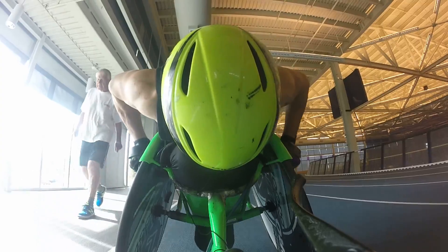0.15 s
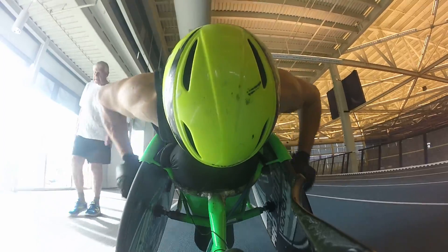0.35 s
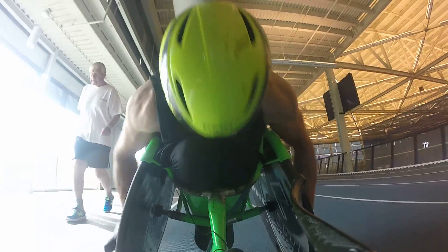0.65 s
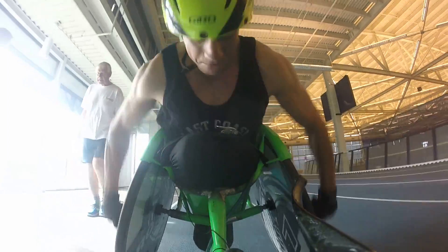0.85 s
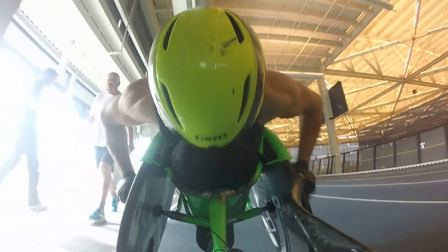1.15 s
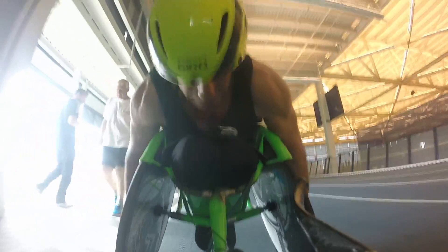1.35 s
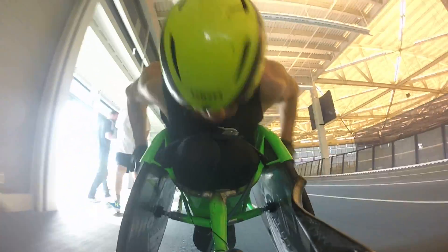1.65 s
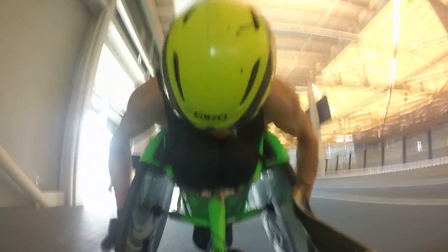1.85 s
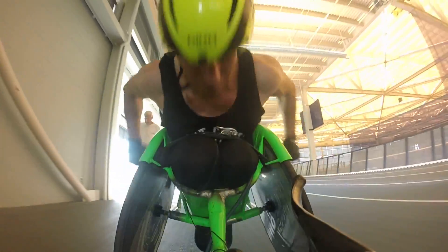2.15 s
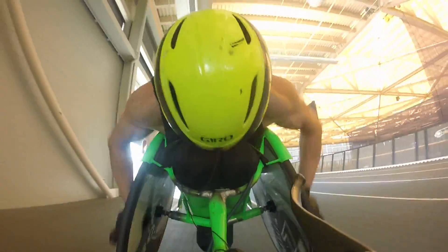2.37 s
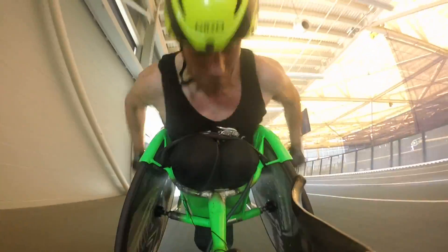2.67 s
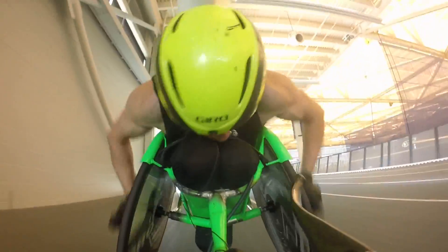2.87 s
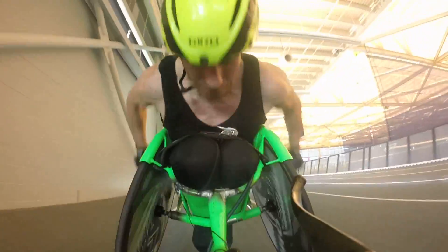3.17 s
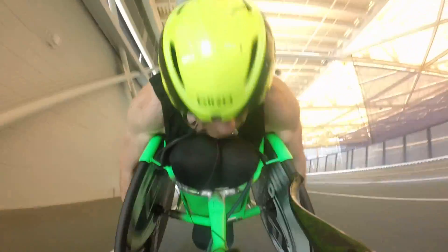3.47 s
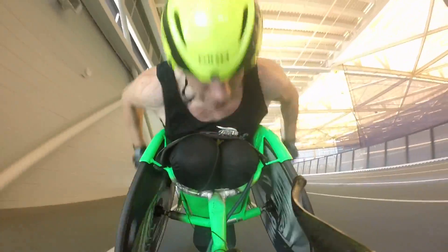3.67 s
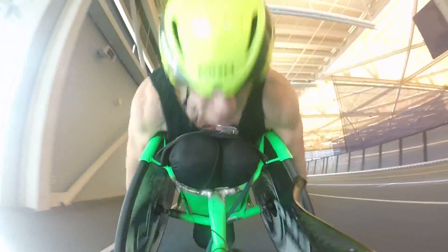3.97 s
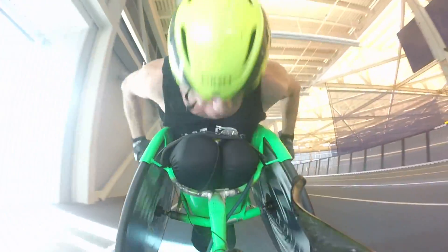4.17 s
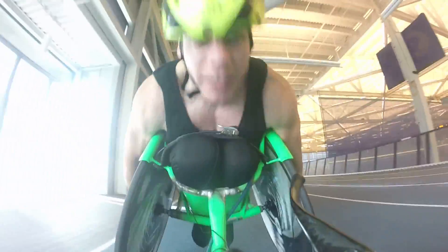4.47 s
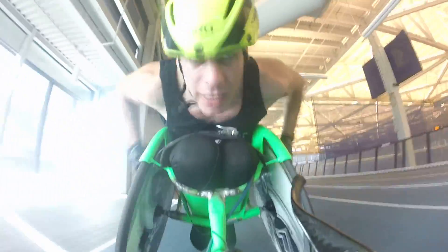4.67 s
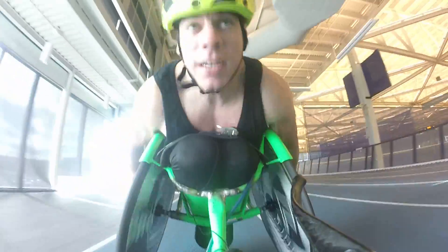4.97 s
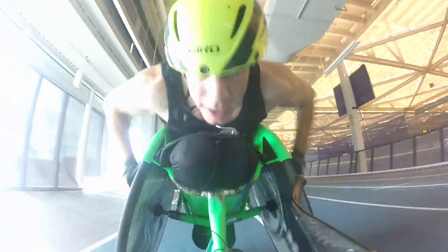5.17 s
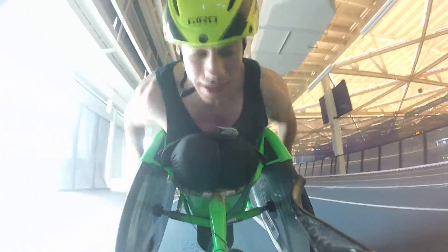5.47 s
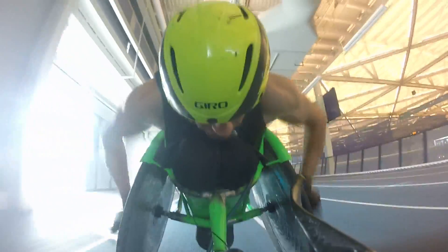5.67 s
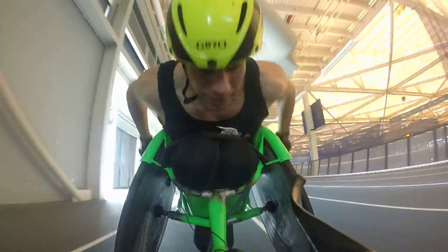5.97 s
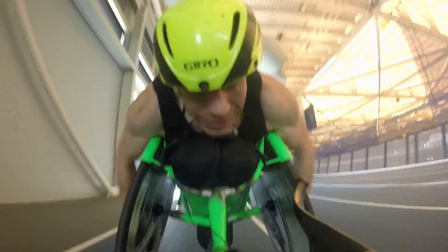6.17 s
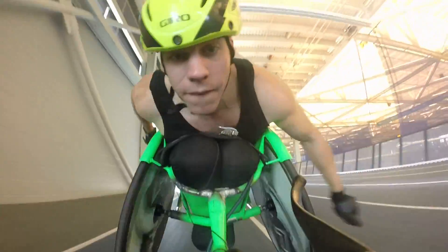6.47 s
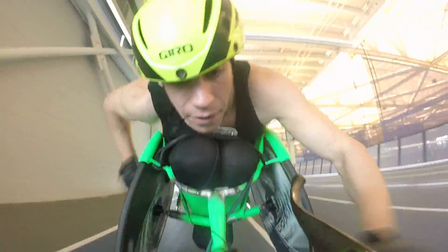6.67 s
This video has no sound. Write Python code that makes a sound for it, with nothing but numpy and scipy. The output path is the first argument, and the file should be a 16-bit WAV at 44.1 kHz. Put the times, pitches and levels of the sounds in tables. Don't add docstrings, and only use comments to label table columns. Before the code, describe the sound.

Racing wheelchair heard from its own frame: deep throbbing vibration, rhythmic jolts at each rim push, sharp clacks, ticking and faint tyre rush.

```python
import sys
import numpy as np
from scipy import signal
from scipy.fft import rfft, irfft, next_fast_len
from scipy.io import wavfile
from scipy.ndimage import uniform_filter1d, map_coordinates

SR = 44100
rng = np.random.default_rng(int(sys.argv[2]) if len(sys.argv) > 2 else 0)


def gain_from_db(level_db):
    decades = np.asarray(level_db, float) / 20
    return 10 ** decades


def master_out(mix):
    frames = np.transpose(np.atleast_2d(mix))
    ceiling = np.clip(frames, -1, 1)
    pcm = np.round(ceiling * 32767).astype(np.int16)
    wavfile.write(sys.argv[1], SR, pcm)


N = 301203

# time in seconds, level in dB.
SWAY = [(0.0, -20), (0.3, -19), (0.566, -15.5), (0.59, -13), (1.1, -16.5), (1.3, -8), (1.85, -21),
        (2.45, -21), (2.76, -15.5), (3.4, -15.5), (3.8, -15), (4.4, -13.5), (5.2, -13.5), (6.83, -10)]
# time in seconds, sway pitch in Hz, flutter level in dB.
SWAY_PITCH = [(0.0, 74.1, -36), (0.36, 74.9, -35), (0.44, 87.1, -37), (1.01, 76.8, -31),
              (1.46, 62.7, -46.5), (1.58, 73.9, -41), (2.38, 72.8, -35), (2.55, 55.3, -44),
              (3.5, 68.1, -39), (4.37, 57.7, -39.5), (5.23, 74.1, -38.5), (6.83, 56.4, -39)]
# quietest time in seconds, depth in dB, recovery in seconds.
LULLS = [(0.351, 10.5, 0.37), (1.203, 12.5, 0.17), (1.338, 24, 0.21), (1.501, 7.5, 0.23),
         (2.018, 27.5, 0.083), (2.587, 16.5, 0.16), (3.102, 14.5, 0.37), (3.439, 7.5, 0.24),
         (3.618, 16, 0.19), (4.049, 12, 0.06), (4.547, 25.5, 0.059), (4.64, 12, 0.026), (4.85, 8.5, 0.053),
         (4.999, 10.5, 0.11), (5.32, 7.5, 0.043), (6.3, 4, 0.024), (6.361, 16, 0.024), (2.975, 5.5, 0.045),
         (6.815, 6.5, 0.091)]
CALM_S, TYRE_CALM = 0.086, 0.66
FLUTTER_LOAD = 0.4
# time in seconds, signed peak of full scale, pitch in Hz.
JOLTS = [(0.594, -.87, 70), (0.623, .65, 66), (0.844, .58, 100), (0.876, -.76, 85), (0.91, -.63, 75),
         (0.96, -.75, 80), (1.092, -.75, 85), (1.247, .95, 72), (1.424, .4, 66), (1.743, .47, 100),
         (1.903, .9, 72), (2.321, -.52, 70), (2.476, .93, 76), (2.88, .56, 83), (3.018, .9, 78),
         (3.339, -.45, 75), (3.37, -.69, 74), (3.504, .82, 78), (3.787, -.72, 64), (3.962, -.65, 70),
         (4.14, .46, 80), (4.305, .71, 72), (4.445, .92, 76), (4.893, -.69, 72), (5.198, .67, 70),
         (5.358, -.61, 68), (5.541, .68, 70), (5.68, -.7, 66), (5.941, -.65, 58), (6.162, -.71, 75),
         (6.395, -.57, 66), (6.642, .66, 70), (6.676, .7, 70), (6.714, .59, 70), (6.748, .53, 62)]
STOP_SHARE, STOP_S = 0.9, 0.018
DOWN_DAMPING = 0.89
WIND_UP, WIND_UP_S = 0.51, 0.008
RELEASE_PEAK, SOFTEN_S = 0.78, 0.0029

# centre in Hz, width in Hz, gain in dB.
TUBE = [(333, 135, 4.5), (861, 255, 2)]
# centre in Hz, width in Hz, gain in dB.
CASE = [(1426, 366, -6.5), (1996, 252, -1), (2017, 35, -5.5)]
# centre in Hz, width in Hz, gain in dB.
SHELL = [(2910, 205, 5.5), (3520, 1860, -4.5), (4710, 250, 4.5), (5950, 470, -3)]
# centre in Hz, width in Hz, gain in dB.
LATCH = [(7600, 680, 1.5), (9700, 390, 0.5), (10700, 1500, -2)]
# centre in Hz, width in Hz, gain in dB.
LIP = [(2980, 650, -2.5), (4600, 670, 0.5), (6140, 1000, -3.5)]

# time in seconds, peak in dB, tube in dB, shell in dB.
CLACKS = [(1.062, -29.5, -4.5, -12.5), (1.1452, -9.5, -5, -3), (1.719, -24, 3, 0.5), (1.885, -24, -3, -13),
          (1.9066, -26.5, 7.5, -4.5), (2.306, -22, -2, -3), (2.3329, -15, 6, -4.5), (2.341, -24, 5.5, -6),
          (2.352, -29.5, -1, -10), (2.4845, -30.5, 12, -3), (2.847, -18, -4.5, -17),
          (2.872, -22.5, -2.5, 0), (2.912, -22.5, 1, -11), (3.341, -19, 2, -4.5), (3.397, -25, 8, -5),
          (3.806, -30.5, -9, -6), (3.844, -26, -2, -4.5), (3.929, -29, -1, -6.5), (4.2958, -22, 5.5, -0.5),
          (4.786, -25.5, 2.5, -5), (5.225, -31, 4, -14), (5.341, -28.5, -1, -1), (5.6849, -19.5, -5, -6),
          (6.1103, -32, 1, -19), (6.777, -15, 2, -5), (6.7987, -11.5, 2.5, -2.5),
          (6.8254, -10.5, -11, -20.5)]
# time in seconds, peak in dB.
RAPS = [(0.012, -34), (0.843, -38), (1.414, -38), (1.511, -37.5), (1.529, -33), (1.806, -31), (2.292, -40),
        (2.3871, -35), (2.475, -32), (3.0167, -31), (3.911, -31.5), (4.389, -30.5), (4.669, -33.5),
        (4.7675, -33.5), (4.827, -36), (5.595, -33.5), (5.7174, -37), (6.18, -29.5), (6.216, -34),
        (6.48, -37)]
# time in seconds, peak in dB, tube in dB.
PINGS = [(0.153, -43, -16), (0.219, -29.5, 0), (0.248, -37.5, -23), (0.361, -30.5, -2), (0.607, -20.5, -6),
         (0.702, -28, -12), (0.728, -27.5, -19), (0.8613, -30, 10), (0.876, -16.5, -16), (0.913, -21, -5),
         (1.106, -21, -21), (1.2245, -30, -6), (1.2547, -27, -12), (2.074, -21, -13), (2.183, -29.5, -11),
         (2.9273, -27, 8.5), (3.4372, -26.5, -2.5), (3.826, -26.5, -7), (4.1018, -23.5, -4),
         (4.3745, -25, 0), (5.323, -28, -10.5), (5.779, -33.5, -11), (6.137, -18, -6), (6.785, -19.5, 12),
         (6.793, -12.5, 5.5)]
# time in seconds, peak in dB, shell in dB.
THUDS = [(0.039, -27.5, -12), (0.1276, -28.5, -29), (0.186, -29, -26), (0.5964, -19.5, -19.5),
         (0.62, -25.5, -38), (0.64, -25.5, -32.5), (0.673, -35, -49), (0.906, -21.5, -38),
         (0.94, -26.5, -42.5), (1.115, -17.5, -22), (1.332, -31, -31), (1.437, -34.5, -12),
         (1.7304, -7, -15.5), (1.772, -24.5, -29), (1.788, -23, -24.5), (2.365, -26, -25),
         (3.3773, -21, -39), (3.5045, -22, -9.5), (3.787, -33, -4), (3.963, -21, -17), (4.3299, -17.5, -27),
         (4.45, -22.5, -16), (4.702, -27.5, -35), (4.8905, -16.5, -13.5), (5.2377, -10.5, -16.5),
         (5.7014, -14, -15), (5.74, -13, -12.5), (5.981, -16.5, -29), (6.153, -4.5, -15),
         (6.2592, -21, -20)]
# time in seconds, peak in dB, tube in dB.
TICKS = [(0.9787, -29, -2), (1.0892, -12.5, 4.5), (1.249, -19.5, 1.5), (2.3212, -21, -36.5),
         (2.7906, -32, 0.5), (2.863, -27.5, -30), (3.368, -24, 0.5), (4.682, -27.5, 5.5),
         (5.545, -33.5, -2), (5.674, -26.5, 0), (6.1436, -17, 4.5), (6.647, -40, -23), (6.678, -30.5, 7)]
# time in seconds, peak in dB.
NUDGES = [
    (0.055, -36),
    (0.097, -42),
    (0.174, -39),
    (0.232, -42),
    (0.769, -41),
    (0.81, -35),
    (1.956, -37),
    (2.203, -36.5),
    (2.587, -37.5),
    (5.758, -34.5),
]
CLACK_S, RAP_S, PING_S, THUD_S, TICK_S, NUDGE_S = 0.0015, 0.0023, 0.0012, 0.0015, 0.0012, 0.0018
RAP_TUBE_DB, RAP_SHELL_DB, NUDGE_TUBE_DB, NUDGE_SHELL_DB = 3, -5, 1, -28.5
PING_SHELL_DB, THUD_CASE_DB, TICK_CASE_DB = -18, 13, 7

# start in seconds, length in seconds, level in dB.
RATTLES = [(1.058, 0.075, -55.5), (1.257, 0.13, -48.5), (1.416, 0.11, -51.5), (1.72, 0.095, -51),
           (1.85, 0.13, -53), (2.077, 0.056, -52.5), (2.289, 0.053, -42), (2.75, 0.06, -53.5),
           (2.832, 0.094, -46.5), (2.988, 0.22, -52.5), (3.357, 0.2, -55.5), (3.79, 0.23, -50.5),
           (4.079, 0.094, -48), (4.23, 0.37, -52.5), (4.664, 0.33, -52.5), (5.028, 0.052, -50.5),
           (5.147, 0.16, -50.5), (5.341, 0.043, -50.5), (5.424, 0.068, -51), (5.539, 0.048, -52),
           (5.674, 0.15, -51.5), (5.877, 0.146, -48.5), (6.103, 0.18, -49), (6.388, 0.21, -50.5),
           (6.636, 0.23, -47.5)]
REST_DB, REST_DB_PER_S, TIRE_DB_PER_S, SETTLE_DB_PER_S = -74, 1.7, 10, 500

# time in seconds, peak in dB.
LIP_EARLY = [(1.1704, -36), (1.1875, -37), (1.226, -46.5), (1.4287, -42), (1.4335, -46), (1.5255, -36),
             (1.74, -39), (1.757, -34), (1.8, -41), (2.19, -43.5), (2.294, -38.5), (2.3414, -37),
             (2.3536, -37), (2.3636, -41), (2.3903, -33.5), (2.478, -50), (2.7583, -42), (2.789, -39.5),
             (2.798, -31.5), (2.8382, -36), (2.84, -37), (2.8494, -26.5), (2.8557, -28.5), (2.887, -36.5),
             (2.893, -44), (2.9137, -33), (3.009, -40), (3.0187, -39), (3.3916, -44), (3.401, -37),
             (3.466, -39), (3.4762, -42), (3.5055, -27), (3.7914, -40), (3.847, -32), (3.8655, -34),
             (3.9172, -44), (3.928, -35), (3.965, -41), (3.9724, -41), (3.9933, -45), (4.1104, -35.5),
             (4.138, -46), (4.1446, -42), (4.156, -43.5), (4.169, -46), (4.253, -43), (4.3126, -33),
             (4.3216, -34.5), (4.35, -38), (4.356, -40), (4.3967, -45), (4.4217, -37.5),
             (1.5618, -47), (2.0068, -54), (2.1321, -49), (2.4309, -53), (2.5047, -45), (2.5144, -49),
             (2.5234, -56), (2.5314, -54), (2.5716, -51), (2.599, -47.5), (2.7007, -46), (2.7357, -54),
             (2.7432, -46), (3.073, -54), (3.102, -52), (3.1183, -44), (3.1603, -41.5), (3.2145, -44.5),
             (3.4481, -37), (3.5892, -49), (3.5984, -49), (3.7717, -46)]
# time in seconds, peak in dB, latch over shell in dB.
LIP_AT_SPEED = [(4.665, -36, -2), (4.6707, -41, 4.5), (4.6852, -44, -15), (4.6951, -37, -6), (4.7422, -42, -8),
                (4.7478, -41, 1), (4.755, -42, -5.5), (4.7715, -46, -4), (4.787, -45, -15.5), (4.8209, -42, -6),
                (4.857, -33.5, -34), (4.8861, -29, -23), (4.8954, -45, -11), (4.9423, -44, -20),
                (4.969, -45, -4), (4.9843, -44, -10), (5.0508, -38, -11), (5.07, -37, -8), (5.166, -41, -1),
                (5.1985, -30, -9), (5.225, -36, -22), (5.2803, -41, -7), (5.2868, -43, -18), (5.3413, -46, -7),
                (5.3607, -34, -7.5), (5.3797, -42.5, -8), (5.3894, -30, -10), (5.4322, -37, -6),
                (5.4403, -45, -5.5), (5.4523, -45, -15), (5.465, -41, -6), (5.477, -42, -4), (5.548, -36.5, 5),
                (5.5554, -46, -8), (5.564, -42, -4.5), (5.596, -37, -25),
                (5.6726, -37, -3), (5.7328, -34, -24), (5.754, -44, -1), (5.7814, -36, -13), (5.792, -43, -7),
            (5.8, -36, -9), (5.807, -38, -10), (5.827, -39, -6), (5.8869, -42.5, -15), (5.8968, -41, -18),
            (5.9213, -38, -6), (5.9407, -31, -16), (5.9497, -38, -6), (5.958, -37, -18), (5.976, -46, 2),
            (5.997, -47, -9.5), (6.0084, -39, -7), (6.0262, -40, 8), (6.0406, -35, -8.5),
            (6.1116, -33, -25), (6.134, -33.5, -5.5), (6.1735, -40, -14), (6.189, -38, -21),
            (6.192, -42, -9.5), (6.197, -32, -8), (6.2036, -38, 1), (6.2176, -41, -2), (6.2524, -42, 0),
            (6.3942, -38, -2), (6.402, -34, -6), (6.4102, -48, -6), (6.431, -35, -7), (6.4368, -40, -5),
            (6.479, -30.5, -7), (6.509, -43, -11), (6.514, -38.5, -3), (6.531, -35.5, -11),
            (6.5523, -31.5, -2.5), (6.5667, -33.5, -8), (6.584, -40, -17), (6.631, -38, -7), (6.65, -30, 2),
            (6.6742, -33.5, 2), (6.7001, -46, 6), (6.7066, -46, -15.5), (6.714, -36, -6),
            (6.72, -42.5, -14), (6.728, -42, -7.5), (6.737, -33, -3), (6.7425, -41, -16), (6.748, -40, -10),
            (6.7544, -39, 1), (6.763, -32, -8)]
LIP_S, LIP_LATCH_DB, LIP_CASE_DB = 0.00087, -9.5, 0.5

# time in seconds, peak in dB.
RINGS = [(1.149, -17.5), (2.022, -57), (3.06, -53), (3.088, -47), (4.0, -51), (4.549, -50), (5.115, -43),
         (5.4, -42), (5.837, -36), (6.085, -45), (6.42, -39), (6.682, -34)]
RING_HZ, RING_RISE_S, RING_FALL_S = 1980, 0.0057, 0.0041
# start in seconds, peak in dB, pitch in Hz, length in seconds.
HUMS = [
    (0.823, -15.5, 145, 0.06),
    (1.713, -13, 140, .045),
    (2.292, -14, 130, .05),
    (3.348, -19, 145, 0.055),
    (4.275, -17.5, 150, 0.049),
    (6.124, -15, 155, 0.059),
    (6.505, -41, 570, .04),
    (6.589, -36, 570, 0.077),
]
# centre in Hz, width in Hz, gain in dB.
CREAK = [(820, 140, 4), (1680, 160, 3.5), (4770, 100, -15.5)]
CREAK_S, CREAK_LENGTH_S, CREAK_DB = 0.515, 0.22, -34.5

# start in seconds, length in seconds, level in dB, extra tyre load in dB.
SCRAPES = [(0.528, 0.27, -39.5, -5), (0.767, 0.28, -34, 4.5), (1.071, 0.037, -18, 14.5),
           (1.683, 0.062, -31.5, 6.5), (2.255, 0.14, -30.5, 11.5), (2.83, 0.024, -27.5, 17.5),
           (3.306, 0.27, -39.5, 20.5), (3.749, 0.38, -55, 12.5), (4.251, 0.075, -62, 12.5),
           (4.667, 0.22, -40.5, 12.5), (5.21, 0.054, -32.5, -3), (5.653, 0.12, -33, -7.5),
           (6.127, 0.049, -25.5, 3.5), (6.777, 0.036, -25.5, 22.5)]
LOAD_LAG_S, LOAD_RISE_S, LOAD_FALL_S = 0.032, 0.033, 0.17
# time in seconds, level in dB.
ROLL = [(0.0, -44), (0.38, -47.5), (0.9, -41), (1.25, -47), (2.6, -50.5), (3.6, -51.5), (4.7, -48),
        (5.5, -43), (6.3, -47), (6.83, -42)]
# frequency in Hz, density in dB per Hz.
TYRE_SPECTRUM = [(110, -22.5), (200, -11.5), (329, 0), (441, -14.5), (555, -9), (675, -18), (1130, -22),
                 (1530, -14), (2370, -36.5), (3500, -37), (4550, -58), (7700, -120)]
# time in seconds, level in dB.
WHIRR = [(0, -57), (2, -72), (3.7, -67), (5.4, -69), (6.83, -62.5)]
# centre in Hz, width in Hz, gain in dB.
WHIRR_BAND = [(1400, 260, 0)]
# time in seconds, level in dB.
WASH = [(0, -55.5), (.5, -57.5), (.65, -53.5), (1.05, -59), (1.25, -80), (6.83, -64)]
# frequency in Hz, density in dB per Hz.
HALL_SPECTRUM = [(2300, -22), (2600, -11.5), (3050, 1.5), (3800, -3.5), (4250, -16.5), (4750, -5),
                 (5200, -12.5), (9000, -17), (12300, -16), (14500, -32)]
FULL_SCALE = 0.99


def unit(x):
    return x / np.sqrt(np.mean(x ** 2) + 1e-20)


def curves(rows):
    s, *columns = np.transpose(rows)
    return [np.interp(np.arange(N) / SR, s, column) for column in columns]


def wobble(rate_hz):
    knots = rng.standard_normal(int(N * rate_hz / SR) + 4)
    return map_coordinates(knots, [np.arange(N) * rate_hz / SR])


def filtered(x, response):
    m = next_fast_len(N + SR // 2)
    return irfft(rfft(x, m) * response(np.fft.rfftfreq(m, 1 / SR)), m)[:N]


def resonate(x, modes):
    def response(f):
        return sum((-1) ** k * gain_from_db(db) * 1j * f * width / (hz * hz - f * f + 1j * f * width)
                   for k, (hz, width, db) in enumerate(modes))
    return filtered(x, response)


def hiss(spectrum):
    hz, db = np.transpose(spectrum)
    return unit(filtered(rng.standard_normal(N), lambda f: gain_from_db(np.interp(np.log(f + 1), np.log(hz), db))))


def bursts(times_s, lengths_s, dbs):
    k = np.arange(SR // 25)
    u = k / (np.clip(lengths_s, .0003, .008)[:, None] * SR)
    shape = np.sqrt(u) * np.exp(-u)
    grit = shape * rng.standard_normal(shape.shape)
    gain = gain_from_db(dbs) * np.linalg.norm(shape, axis=1) / np.linalg.norm(grit, axis=1)
    rows = gain[:, None] * grit
    at = np.round(times_s * SR).astype(int)[:, None] + k
    return np.bincount(at.ravel(), rows.ravel(), N + len(k))[:N]


def boom(calm_db, load_db):
    hz, flutter_db = curves(SWAY_PITCH)
    sway_db = curves(SWAY)[0] + calm_db
    phase = 2 * np.pi * np.cumsum(hz * (1 + .12 * wobble(18))) / SR
    swing = gain_from_db(3 * wobble(21)) * np.sin(phase)
    slow = filtered(rng.standard_normal(N), lambda f: 1 / (1 + (f / 72) ** 6))
    bumps = resonate(slow, [(56.5, 22, 0)])
    bending = resonate(resonate(rng.standard_normal(N), [(114.9, 35, 0)]), [(123.0, 100, 0)])
    bending = unit(gain_from_db(2.2 * wobble(12)) * bending)
    flutter = gain_from_db(flutter_db + FLUTTER_LOAD * load_db + .5 * sway_db + 14.0) * bending
    sway = unit(swing) + .6 * unit(bumps)
    spread = np.abs(uniform_filter1d(sway ** 2, size=3500)) + .05
    return gain_from_db(sway_db) * unit(sway / spread ** 0.33) + flutter


def lulls():
    t = np.arange(N) / SR
    return -sum(np.interp(t, [s - CALM_S, s, s + back_s], [0, depth_db, 0]) for s, depth_db, back_s in LULLS)


def stopped():
    t = np.arange(N) / SR
    stops = [np.interp(t, [s - STOP_S / 2, s, s + STOP_S / 2, s + 2 * STOP_S], [0, 1, 1, 0])
             for s, *_ in JOLTS]
    return 1 - STOP_SHARE * np.max(stops, axis=0)


def jolts():
    out, t = np.zeros(N + SR), np.arange(SR // 6) / SR
    lead = np.sin(np.pi * np.arange(round(WIND_UP_S * SR)) / (WIND_UP_S * SR)) ** 2
    for s, peak, hz in JOLTS:
        padded = peak < RELEASE_PEAK
        cycles = 0.86 * hz * t + .16 * (1 - np.exp(-t / 0.0035))
        life_s = t / (DOWN_DAMPING if peak < 0 else 1)
        decay = np.exp(-life_s / 0.0062) + 0.25 * np.exp(-life_s / 0.023)
        ring = np.sin(2 * np.pi * cycles) * decay * (1 - np.exp(-t / 0.0034))
        shove = np.append(-WIND_UP * padded * lead, ring / ring.max())
        if padded:
            shove = uniform_filter1d(shove, size=round(SOFTEN_S * SR))
        out[round(s * SR) - len(lead):][:len(shove)] += peak * shove / shove.max()
    return out[:N]


def contacts():
    return ([(s, db, tube, shell, CLACK_S) for s, db, tube, shell in CLACKS]
            + [(s, db, RAP_TUBE_DB, RAP_SHELL_DB, RAP_S) for s, db in RAPS]
            + [(s, db, NUDGE_TUBE_DB, NUDGE_SHELL_DB, NUDGE_S) for s, db in NUDGES]
            + [(s, db, tube, PING_SHELL_DB, PING_S) for s, db, tube in PINGS]
            + [(s, db - THUD_CASE_DB, THUD_CASE_DB, shell + THUD_CASE_DB, THUD_S) for s, db, shell in THUDS]
            + [(s, db - TICK_CASE_DB, tube + TICK_CASE_DB, TICK_CASE_DB, TICK_S) for s, db, tube in TICKS])


def knocks(table, boost_db):
    s, db, tube_db, shell_db, length_s = np.transpose(table)
    s, db = s - .3 * length_s, db + boost_db
    tube = 0
    for k, shift in enumerate([.93, 1, 1.08]):
        hits = bursts(s[k::3], 0.71 * length_s[k::3], (db + tube_db)[k::3] + 25.5)
        tube = tube + resonate(hits, [(hz * shift, width, gain) for hz, width, gain in TUBE])
    case = resonate(bursts(s, 1.83 * length_s, db + 27.0), CASE)
    shell = resonate(bursts(s, 1.61 * length_s, db + shell_db + 16.0), SHELL)
    latch_db = 1.25 * (db + shell_db) + 15.0 + 3 * rng.standard_normal(len(s))
    latch = resonate(bursts(s, 0.88 * length_s, latch_db), LATCH)
    return tube + case + shell + latch


def play():
    t = np.arange(N) / SR
    opened = []
    for s, length_s, db in RATTLES:
        settling = SETTLE_DB_PER_S * np.maximum(t - s - length_s, 0)
        opened.append(np.where(t < s, REST_DB, db - TIRE_DB_PER_S * (t - s) - settling))
    return np.maximum(REST_DB + REST_DB_PER_S * t, np.max(opened, axis=0))


def chatter(sway, level_db):
    slots = N // 100 + 1
    luck = np.clip(rng.standard_normal((4, slots)), -2, 1.2)
    smooth = np.abs(uniform_filter1d(sway, size=40))
    turns = signal.find_peaks(smooth, distance=110)[0]
    s, db = np.zeros(slots), np.full(slots, -200.)
    s[turns // 100] = turns / SR
    db[turns // 100] = level_db[turns] + 11 * np.log10(smooth[turns] + 0.0048) + 27
    clumps_db = 1.7 * np.resize(wobble(11.0)[::100], slots)
    s = np.abs(s + 0.0017 * luck[0])
    db = db + 5 * luck[1] + clumps_db
    length_s = .0011 * gain_from_db(3.5 * luck[2])
    ticks = bursts(s, length_s, db)
    latch = resonate(bursts(s, length_s, db + 6 * luck[3] - 6.0), LATCH[:1])
    return resonate(ticks, SHELL) + gain_from_db(4.0) * resonate(ticks, CASE) + gain_from_db(9) * resonate(ticks, TUBE) + latch


def lip():
    rows = [(s, db, LIP_LATCH_DB) for s, db in LIP_EARLY] + LIP_AT_SPEED
    s, db, latch_db = np.transpose(rows)
    length_s = LIP_S * gain_from_db(3.2 * rng.standard_normal(len(s)))
    ticks = bursts(s, length_s, db + 15.5)
    latch = bursts(s, length_s, db + latch_db + 20.0)
    return resonate(ticks, LIP) + gain_from_db(LIP_CASE_DB) * resonate(ticks, CASE) + resonate(latch, LATCH[:1])


def rings():
    out, t = np.zeros(N + SR), np.arange(SR // 20) / SR
    shape = (1 - np.exp(-t / RING_RISE_S)) * np.exp(-t / RING_FALL_S)
    for s, db in RINGS:
        hz = RING_HZ * (1 + .012 * rng.standard_normal())
        out[round(s * SR):][:len(t)] += gain_from_db(db) * shape / shape.max() * np.sin(2 * np.pi * hz * t)
    return out[:N]


def hums():
    t, waver_s = np.arange(N) / SR, np.cumsum(1 + 0.052 * wobble(40)) / SR
    out = np.zeros(N)
    for s, db, hz, length_s in HUMS:
        swell = np.sin(np.pi * np.clip((t - s) / length_s, 0, 1)) ** 2
        out += gain_from_db(db) * swell * np.sin(2 * np.pi * hz * waver_s)
    return out


def creak():
    u = np.clip((np.arange(N) / SR - CREAK_S) / CREAK_LENGTH_S, 0, 1)
    slips = gain_from_db(3.8 * wobble(70.56)) * rng.standard_normal(N)
    return gain_from_db(CREAK_DB) * np.sin(np.pi * u) * unit(resonate(slips, CREAK))


def gloves():
    t, level = np.arange(N) / SR, np.zeros(N)
    for s, length_s, db, _ in SCRAPES:
        level += gain_from_db(db) * np.sin(np.pi * np.clip((t - s) / length_s, 0, 1))
    grit = gain_from_db(4.3 * wobble(45) + 5.4 * wobble(160)) * rng.standard_normal(N)
    shell = np.minimum(4 * level, 1) * resonate(grit, SHELL)
    return level * unit(resonate(grit, TUBE) + gain_from_db(-3.5) * resonate(grit, CASE) + shell)


def push_load():
    t = np.arange(N) / SR - LOAD_LAG_S
    loads = [db * np.exp(np.minimum((t - s) / LOAD_RISE_S, (s - t) / LOAD_FALL_S)) for s, _, _, db in SCRAPES]
    return np.max(loads, axis=0)


def tyres(level_db):
    grit = gain_from_db(1.5 * wobble(14) + 2.8 * wobble(50) + 2.2 * wobble(130))
    return gain_from_db(level_db + 3.5) * unit(grit * hiss(TYRE_SPECTRUM))


def whirr(load_db):
    band = resonate(resonate(rng.standard_normal(N), WHIRR_BAND), WHIRR_BAND)
    return gain_from_db(curves(WHIRR)[0] + 0.13 * load_db + 2.5 * wobble(29)) * unit(band)


def hall():
    return gain_from_db(curves(WASH)[0] + 1.7 * wobble(12)) * hiss(HALL_SPECTRUM)


def scene():
    calm_db, load_db = lulls(), push_load()
    sway = boom(calm_db, load_db) * stopped() + jolts()
    hits = knocks(contacts(), boost_db=-4.0) + chatter(sway, play()) + lip()
    notes = rings() + hums() + creak()
    rolling = gloves() + tyres(curves(ROLL)[0] + load_db + TYRE_CALM * calm_db) + whirr(load_db)
    return (sway + hits + notes + rolling + hall())[None]


def low_pass(x):
    return signal.sosfilt(signal.butter(12, 15730, fs=SR, output="sos"), x)


def record(dry):
    dull = filtered(dry[0], lambda hz: 1 / (1 + 1j * hz / 11500) ** 4 / (1 + (hz / 15000) ** 24))[None]
    soft = dull / (1 + np.abs(dull / FULL_SCALE) ** 6) ** (1 / 6)
    return low_pass(soft)


dry = scene()
out = record(dry)
master_out(out)
```